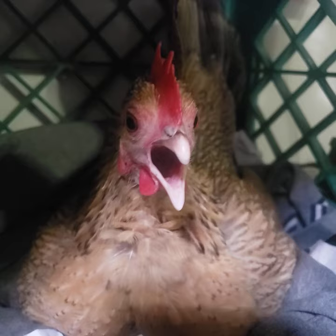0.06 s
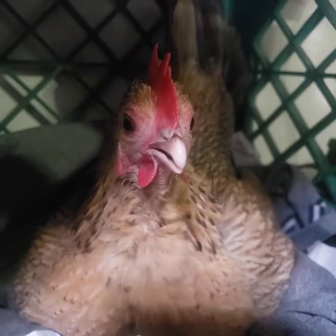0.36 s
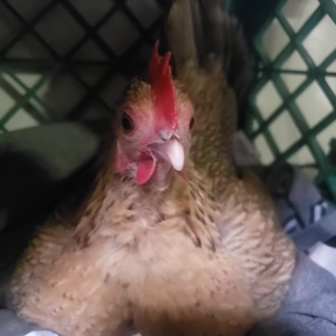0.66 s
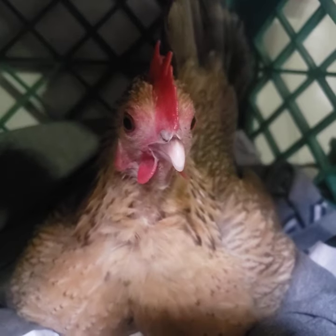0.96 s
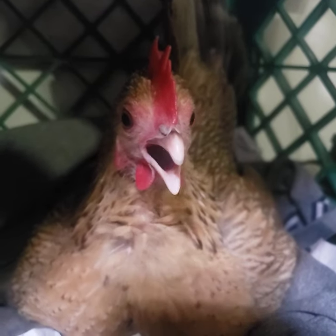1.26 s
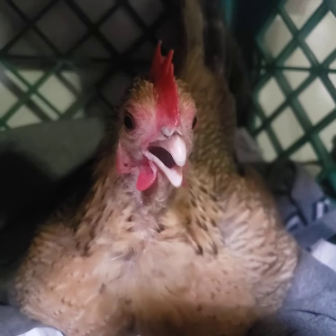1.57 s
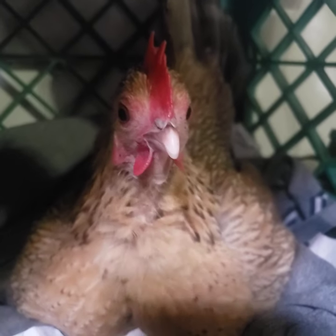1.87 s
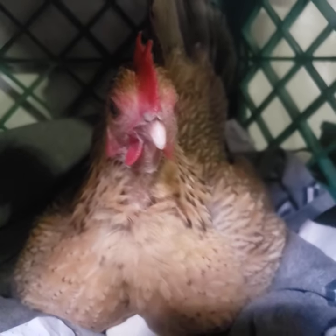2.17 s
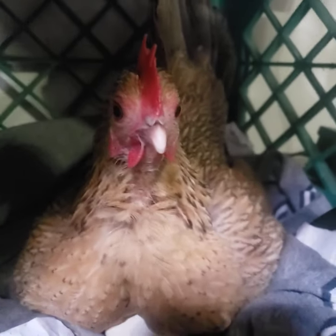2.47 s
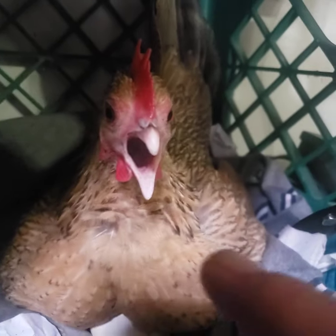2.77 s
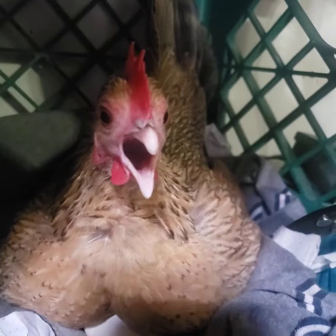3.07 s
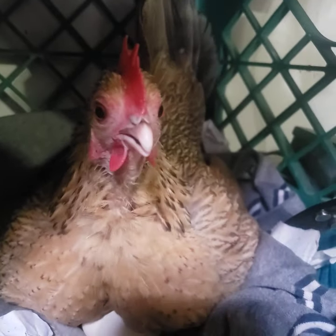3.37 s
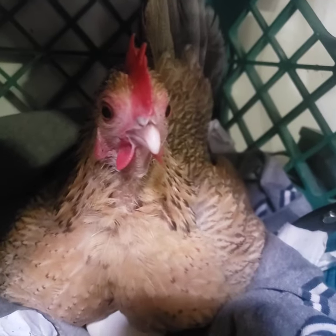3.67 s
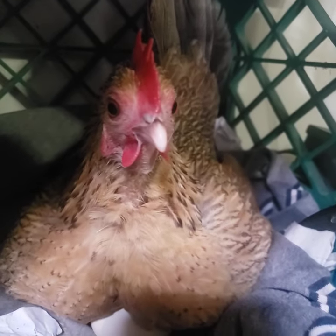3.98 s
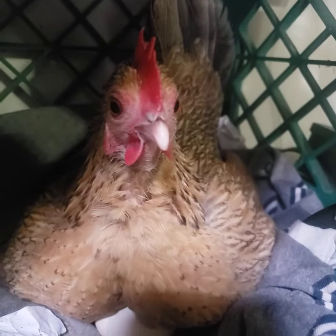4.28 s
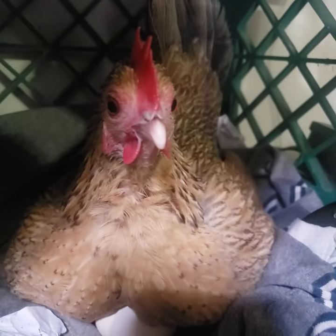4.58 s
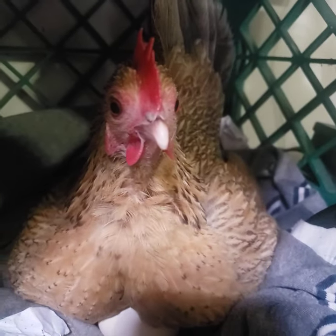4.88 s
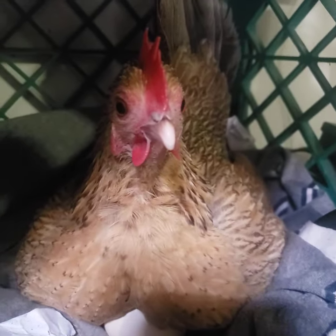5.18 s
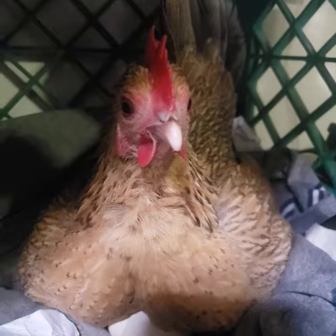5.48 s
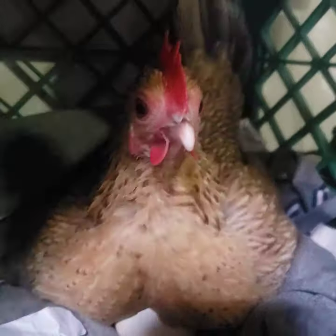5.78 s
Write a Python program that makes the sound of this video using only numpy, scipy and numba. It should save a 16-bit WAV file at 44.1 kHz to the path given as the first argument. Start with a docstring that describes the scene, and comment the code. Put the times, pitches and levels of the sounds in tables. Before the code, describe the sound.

A hen squawks three times at close range, with short pauses between, each call starting as a raspy growl and breaking into a throbbing cry. A faint bump and rustle of bedding comes before the last one. Tiny peeps and thin, high whines follow, then more soft rustling and a single tick from her plastic crate. The small room sounds dry, with a quiet hum underneath.

```python
"""Indoors, over a low room hum, a hen in a plastic crate gives three harsh, close squawks.
Each swells from a growl, breaks into full voice, arches in pitch and drops as the beak shuts;
her syrinx throbs and flips between two registers, ringing throat and beak. Bedding bumps and
rustles before the third. Then she peeps and whines softly. Background rumble and hiss grow louder
towards the end as the recorder's gain recovers; the bedding rustles and the crate ticks once."""
import sys
import numpy as np
from scipy import signal
from scipy.fft import rfft, irfft
from scipy.io import wavfile
from scipy.ndimage import uniform_filter1d, minimum_filter1d, map_coordinates
from numba import njit

SR = 44100
rng = np.random.default_rng(int(sys.argv[2]) if len(sys.argv) > 2 else 0)


def log_audio(samples):
    """Write samples as a 16-bit WAV file to the path given in sys.argv[1]."""
    # one column per channel
    frames = np.atleast_2d(samples).T
    # limit to full scale, then quantise
    limited = np.clip(frames, -1, 1)
    pcm = np.round(limited * 32767).astype(np.int16)
    wavfile.write(sys.argv[1], SR, pcm)


N = 261954
T = np.arange(N) / SR
FREQS_HZ = np.maximum(np.arange(2049) * SR / 4096, 1)

# background noise spectrum: freq_hz, gain_db
ROOM_SPECTRUM = [(15, -55), (25, -15.5), (44, -11.5), (64, -10.5), (82, -6.5), (102, -4.5), (153, -3.5),
                 (180, -9), (242, -5), (326, -16), (363, -17.5), (818, -28), (2550, -35), (7920, -54),
                 (16000, -68)]
# noise floor as the recorder's gain recovers: time_s, rumble_db (before trim), hiss_db
NOISE_FLOOR_RISE = [(0, -55, -64), (4.3, -58, -64.5), (4.7, -51.5, -61), (5.3, -51.5, -60.5),
                    (5.57, -47.5, -57.5), (5.79, -43, -54), (5.94, -43.5, -53)]
# appliance hum: freq_hz, level_db (before trim)
HUM_TONES = [(59.2, -59), (113.0, -64), (156.1, -62.5), (242.2, -68)]
# bedding rustles: time_s, half_length_s, scuff_db, hiss_db
BEDDING_RUSTLES = [(2.304, 0.048, -60.5, -67), (3.965, 0.016, -83, -60.5), (4.327, 0.024, -77, -68.5),
                   (5.529, 0.035, -59.5, -55.5), (5.685, 0.055, -62, -62), (5.768, 0.015, -57, -55)]
# bedding bumps: time_s, level_db
BEDDING_BUMPS = [(2.201, -58), (2.225, -56)]
# bedding and crate spectra: freq_hz, gain_db
SCUFF_SPECTRUM = [(200, 8), (700, 16.5), (1100, 11), (1400, -17), (1900, -22), (3000, -7), (8000, -42)]
HISS_SPECTRUM = [(800, -24), (2000, 1.5), (4000, -8.5), (5500, 1.5), (8200, -31), (12000, -8), (16000, -36)]
TICK_SPECTRUM = [(200, -6), (1200, -12), (2400, 0), (4000, -3), (6000, -17), (16000, -32)]
# soft peeps: time_s, peak_db, pitch_hz, half_length_s
PEEP_NOTES = [(3.638, -60.5, 1070, 0.016), (3.68, -56.5, 1153, 0.013), (3.883, -56, 1284, 0.013),
              (4.482, -59.5, 1416, 0.019), (4.731, -62, 1860, 0.017)]
# shut-beak whines: start_s, end_s, mid_pitch_hz, mid_level_db
WHINE_NOTES = [(3.679, 3.88, 1865, -69.5), (3.885, 4.125, 1907, -69.5), (4.114, 4.19, 2000, -63),
               (4.195, 4.32, 1965, -68), (4.472, 4.772, 1944, -54)]
# left microphone port re right: freq_hz, gain_db
PORT_SHADING = [(200, -3.5), (1400, 1.5), (1800, 2), (2200, 22.5), (2700, 23), (3100, 6), (3500, 13.5),
                (3800, 3), (4250, 12), (5500, 3.5), (7000, 0.5), (9500, 11), (12000, -2), (14000, 14)]
# left port re right: freq_hz, lead_rad
PORT_PHASE = [(0, -0.5), (1210, 1.6144), (1890, 3), (3530, 4), (3880, 6), (4390, 4.5), (5510, 11),
              (8790, 17), (9730, 11), (10200, 17), (11700, 14.5), (13300, 27.5), (14200, 12), (15800, 16.5)]
# windpipe resonances: freq_hz, width_hz, gain_db
THROAT_MODES = [(1230, 1900, -20), (1700, 470, -5.5), (2380, 1100, -2), (2640, 1900, -3.5), (3268, 400, 2),
                (4160, 560, -5.5), (5420, 880, -13.5), (7000, 140, -23.5), (7880, 95, -24.5),
                (9610, 1100, -19), (11020, 1100, -14.5), (13800, 1700, -13), (15700, 1500, -20.5)]
# voice cracks: time_s, half_length_s, lift_db, pitch_drop_share
VOICE_CRACKS = [(.009, 0.003, 9, 0.037), (0.107, 0.0063, 3.5, 0.0053), (0.171, 0.0037, 3, 0.017),
                (1.177, 0.004, 9, 0.0042), (1.199, 0.0036, 16, 0.13), (1.218, 0.0035, 4.5, 0.035),
                (1.295, 0.0046, 13.5, 0.17), (1.304, .005, 8.5, 0.087), (1.319, .006, 9.5, .11),
                (1.597, .008, 1.5, .06), (1.631, 0.0051, -9, .04), (1.643, 0.016, 2, 0.025)]
# timing per squawk: start_s, break_s, end_s
SQUAWK_TIMES = [(-.35, .06, .378), (1.116, 1.39, 1.671), (2.602, 2.86, 3.265)]
# lower-register arch per squawk: top_s, half_length_s, rest_hz, top_hz
PITCH_ARCHES = [(0.342, .03, 730.8, 828), (1.503, .112, 698, 815.3), (2.999, .18, 714.7, 782.5)]
# effort per squawk: loudest_s, full_db, growl_at_1s_db
SQUAWK_EFFORTS = [(.24, -19.5, -15.5), (1.455, -16.5, -17), (3.05, -19, -14.5)]
# timbre per squawk: throb_hz, growl_treble_db, full_treble_db, fundamental_db
SQUAWK_TIMBRES = [(49.16, -9.5, -9, -9), (38.42, -5.5, -8.5, -4), (40.76, -10, -7.5, -19.5)]
# register curve per squawk: time_s, upper_share
REGISTER_CURVES = [
    [(.17, 0.01), (.28, 0.48), (.31, .5), (.333, 0.04)],
    [(1.383, 0.02), (1.392, 0.99), (1.625, 1), (1.665, .7)],
    [(2.91, 0.05), (3.05, .35), (3.165, .75), (3.18, 0.9)],
]
# roughness curve per squawk: time_s, roughness (clipped to 0-1)
ROUGHNESS_CURVES = [
    [(0, 0.73), (.08, 0.99), (.31, 1.07), (.355, 0.48)],
    [(1.122, 0.36), (1.25, 0.77), (1.383, 0.82), (1.392, .08), (1.44, 0.3), (1.48, 0.18), (1.585, .22),
     (1.64, 0.9)],
    [(2.603, 0.48), (2.72, .95), (2.783, 0.78), (2.79, 0.13), (2.855, 0.1), (2.866, 0.88), (3.165, 0.8),
     (3.18, 0.02)],
]


def undb(db):
    return 10 ** (np.asarray(db) / 20)


def curves(rows, t):
    """Each value column, interpolated at t."""
    knots, *columns = np.transpose(rows)
    return [np.interp(t, np.sort(knots), column) for column in columns]


def colour(spectrum, freq_hz=FREQS_HZ):
    """Linear gain of a spectrum at freq_hz."""
    knots_hz, gain_db = np.transpose(spectrum)
    return undb(np.interp(np.log(freq_hz + 1), np.log(knots_hz), gain_db))


def unit_rms(x):
    return x / np.sqrt(np.mean(x ** 2))


def walk(rate_hz, n):
    """Smooth random wander, spread near 1."""
    position = np.arange(n) * rate_hz / SR
    return map_coordinates(rng.standard_normal(n // 4), [position], order=2, mode="wrap")


def noise(spectrum):
    """Coloured noise, rms 1."""
    gain = colour(spectrum, np.arange(N // 2 + 1) * SR / N)
    return unit_rms(irfft(rfft(rng.standard_normal(N)) * gain, N))


def ring(x, gain):
    """Minimum-phase filter with this gain over FREQS_HZ."""
    cepstrum = irfft(np.log(gain + 1e-6))
    half = len(cepstrum) // 2
    cepstrum[1:half] *= 2
    cepstrum[half + 1:] = 0
    return signal.fftconvolve(x, irfft(np.exp(rfft(cepstrum)))[:half])[:len(x)]


def split(x, hz):
    """Bands below and above hz."""
    low = signal.sosfiltfilt(signal.butter(4, hz, fs=SR, output="sos"), x)
    return low, x - low


def steady(pair, window_samples=2200):
    """Hold the slow level at rms 1; quick throbs stay."""
    return pair / np.sqrt(np.abs(uniform_filter1d(pair.mean(0) ** 2, window_samples)) + 1e-12)


@njit
def bandpass(x, centre_hz, width_hz):
    """State-variable band-pass, moving centre."""
    out, band_state, low_state = np.empty(len(x)), 0., 0.
    for i in range(len(x)):
        g, damping = np.tan(np.pi * centre_hz[i] / SR), width_hz / centre_hz[i]
        band = (band_state + g * (x[i] - low_state)) / (1 + g * (g + damping))
        band_state = 2 * band - band_state
        low_state += 2 * g * band
        out[i] = damping * band
    return out


def background(rumble_trim_db=1, hum_trim_db=-2, low_spread=.22, high_spread=.91):
    """Wavering appliance hum; near-mono rumble and wide hiss rise as the recorder's gain recovers."""
    rumble_db, hiss_db = curves(NOISE_FLOOR_RISE, T)
    low, high = split(noise(ROOM_SPECTRUM), 400)
    low_side, high_side = split(noise(ROOM_SPECTRUM), 400)
    sides = np.array([[1], [-1]])
    hum = sum(undb(db + hum_trim_db) * unit_rms(np.sin(2 * np.pi * hz * T + 2.1 * walk(10, N)))
              for hz, db in HUM_TONES)
    rumble = undb(rumble_db + rumble_trim_db) * (unit_rms(low) + low_spread * sides * unit_rms(low_side))
    hiss = undb(hiss_db) * (unit_rms(high) + high_spread * sides * unit_rms(high_side))
    return (rumble + hum) * undb([[-.4], [.4]]) + hiss


def walls(x, t60_s=.11, wet_db=-25, cutoff_hz=6500):
    """Short, dull tail of the crate and a small furnished room."""
    t = T[:SR // 2]
    tails = rng.standard_normal((2, len(t))) * undb(-60 * t / t60_s) * (t > .003)
    tails = signal.sosfilt(signal.butter(2, cutoff_hz, fs=SR, output="sos"), tails)
    return undb(wet_db) * np.array([signal.fftconvolve(x, h / np.linalg.norm(h))[:N] for h in tails])


def bedding(grain_db=3, grain_hz=270, bump_decay_s=.013):
    """Cloth bumps, scuffs and hisses in grains."""
    scuff, hiss = np.zeros((2, N))
    for time_s, half_s, scuff_db, hiss_db in BEDDING_RUSTLES:
        envelope = np.exp(-((T - time_s) / half_s) ** 2)
        scuff += undb(scuff_db) * envelope
        hiss += undb(hiss_db) * envelope
    for time_s, db in BEDDING_BUMPS:
        scuff += undb(db) * (T > time_s) * np.exp(-np.abs(T - time_s) / bump_decay_s)
    mid, side = (undb(grain_db * walk(grain_hz, N))
                 * (scuff * noise(SCUFF_SPECTRUM) + hiss * noise(HISS_SPECTRUM)) for _ in range(2))
    return np.array([mid + side, mid - side])


def crate_tick(time_s=5.6513, impulse_db=-10.5):
    """One impulse rings the plastic."""
    return ring(undb(impulse_db) * (np.arange(N) == int(time_s * SR)), colour(TICK_SPECTRUM))


def peeps(quiver=.03):
    """Short, quivering sine notes."""
    clock_s = np.cumsum(1 + quiver * walk(170, N)) / SR
    return sum(undb(db) * np.exp(-((T - time_s) / half_s) ** 2) * np.sin(2 * np.pi * hz * clock_s)
               for time_s, db, hz, half_s in PEEP_NOTES)


def whines(rise_hz_per_s=220, swell_db_per_s=22, attack_s=.017, release_s=.074):
    """Thin, fluttering shut-beak tones that rise and swell; purer when quiet."""
    out = np.zeros(N)
    waver = 1 + .012 * walk(200, N) + .00309 * walk(30, N)
    flutter = undb(2.6 * walk(90, N))
    for start_s, end_s, hz, db in WHINE_NOTES:
        from_mid_s = np.clip(T, start_s, end_s) - (start_s + end_s) / 2
        phase = 2 * np.pi * np.cumsum((hz + rise_hz_per_s * from_mid_s) * waver) / SR
        gate = np.clip(np.minimum((T - start_s) / attack_s, (end_s - T) / release_s), 0, 1)
        bright = undb(.11 * (db + 45))
        overtones = bright * undb(-12) * np.sin(2 * phase) + bright ** 2 * undb(-14) * np.sin(3 * phase)
        tone = np.sqrt(2) * (np.sin(phase) + overtones)
        out += gate * flutter * undb(db + swell_db_per_s * from_mid_s) * tone
    return out


def ports(x):
    """The right microphone port faces away: the hen arrives later and shaded."""
    lead_rad, = curves(PORT_PHASE, FREQS_HZ)
    response = np.fft.fftshift(irfft(np.exp(-1j * lead_rad) / colour(PORT_SHADING)))
    return np.array([x, signal.fftconvolve(x, response)[len(response) // 2:][:len(x)]])


def crate_bounce(pair, gain=.87, delay_s=.0014, sway=.07):
    """One wall reflection per port; the path shifts as the head moves."""
    i = np.arange(pair.shape[1])
    echoes = [np.interp(i - SR * delay_s * (1 + sway * walk(3.2, len(i))), i, x) for x in pair]
    return pair + gain * np.array(echoes)


def cracks(t):
    """Brief voice cracks: lift in dB, pitch factor."""
    lift_db, pitch_factor = 0, 1
    for time_s, half_s, db, drop in VOICE_CRACKS:
        bump = np.exp(-((t - time_s) / half_s) ** 4)
        lift_db += bump * db
        pitch_factor -= bump * drop
    return lift_db, pitch_factor


def pitch(t, start_s, end_s, top_s, half_s, rest_hz, top_hz, scoop_s=.019, drop_s=.011):
    """Lower-register pitch in Hz: scoop up, flat-topped arch, final drop."""
    arch_hz = rest_hz + (top_hz - rest_hz) * np.exp(-np.abs((t - top_s) / half_s) ** 5)
    scoop = 1 - .34 * np.exp((start_s - t) / scoop_s)
    drop = 1 - .37 * np.exp((t - end_s) / drop_s)
    return arch_hz * scoop * drop


def effort(t, start_s, break_s, end_s, loudest_s, full_db, growl_at_1s_db, crossfade_s=.013):
    """Level in dB and full-voice share: a growl grows linearly, then breaks into a hump."""
    full = np.clip(.5 + (t - break_s) / crossfade_s, 0, 1)
    growl_db = growl_at_1s_db + 20 * np.log10(t - start_s)
    hump_db = full_db - 16 * ((t - loudest_s) / (end_s - break_s)) ** 2
    return (1 - full) * growl_db + full * hump_db, full


def beak(db, left_s, cry, half_open_db=-39, closing_s=.075, shut_hz=950, open_hz=3050, cry_hz=2200):
    """Opening 0-1 and mouth resonance in Hz; opens with effort, narrows near the end."""
    closing = 1 - .42 * np.exp(-(left_s / closing_s) ** 4)
    opening = closing / (1 + np.exp((half_open_db - db) / 8))
    return opening, (1 - cry) * (shut_hz + (open_hz - shut_hz) * opening) + cry * cry_hz


def vocal_tract(source, mouth_hz, mouth_gain=2.1, mouth_width_hz=700., low_cut_hz=880):
    """Mouth and windpipe resonate; a small beak radiates little bass."""
    power = sum((undb(db) / (1 + (2 * (FREQS_HZ - hz) / width_hz) ** 2)) ** 2
                for hz, width_hz, db in THROAT_MODES)
    gain = np.sqrt(power / (1 + (low_cut_hz / FREQS_HZ) ** 6))
    return ring(source + mouth_gain * bandpass(source, mouth_hz, mouth_width_hz), gain)


def syrinx(t, hz, upper, rough, soft, throb_hz, fundamental_db, leap_ratio):
    """Membranes clap twice a cycle, unequally; forced, they throb, stumble and leap a register."""
    n = len(t)
    throb_cycles = np.cumsum(throb_hz * (1 + .14 * walk(60, n))) / SR
    throb = np.tanh(2 * np.sin(2 * np.pi * throb_cycles)) * (1 - .65 * soft)
    # the upper register holds for part of each throb
    leapt = uniform_filter1d(1. * (throb_cycles % 1 < 1.4 * upper - .2), size=50)
    hz = hz * leap_ratio ** leapt * (1 - .04 * np.sqrt(rough) * throb)
    throb_db = 3.5 * rough * throb * (1 - upper)
    # membranes lock on each swell, stumble in between
    rough = rough * (1 - .42 * throb)
    jitter = rough * (.025 * (1 - soft) * walk(250, n) + .065 * walk(1400, n))
    phase = 2 * np.pi * np.cumsum(hz * (1 + jitter)) / SR
    odd_gain = undb(-7 * (1 - leapt) - 5 * leapt)
    claps = undb(fundamental_db * (1 - leapt * upper)) * np.cos(phase)
    for k in range(2, 27):
        gain = odd_gain ** (k % 2) * (k / 4) ** (-1.2 * soft) * (k * hz < SR * .42)
        claps += gain * np.cos(k * phase - .4 * k * k)  # rolling closure: high partials lag
    period_doubling = (.25 + .45 * leapt) * np.cos(phase / 2)
    claps *= 1 + rough * (period_doubling + .2 * walk(900, n))
    air_gain = .6 * (rough ** 1.8 * (1 + 3 * soft) + .025)
    air = air_gain * (1 + np.cos(2 * phase)) * rng.standard_normal(n)
    return (claps + air) * undb(throb_db)


def squawks(leap_ratio=1.4, shrill_hz=3950, shrill_half_width_hz=290, shrill_db=10,
            shut_treble_db=-20.5, rasp_top_db=1.5, cry_top_db=-6.5, gate_s=.013):
    """The syrinx drives the vocal tract; effort sets loudness and brightness."""
    out = np.zeros((2, N))
    for i, (start_s, break_s, end_s) in enumerate(SQUAWK_TIMES):
        throb_hz, growl_treble_db, full_treble_db, fundamental_db = SQUAWK_TIMBRES[i]
        span = (T > start_s) & (T < end_s)
        t = T[span]
        upper, = np.clip(curves(REGISTER_CURVES[i], t), 0, 1)
        rough, = np.clip(curves(ROUGHNESS_CURVES[i], t), 0, 1)
        cry = upper ** 4  # sustained upper register
        lift_db, pitch_factor = cracks(t)
        hz = pitch(t, start_s, end_s, *PITCH_ARCHES[i]) * pitch_factor
        db, full = effort(t, start_s, break_s, end_s, *SQUAWK_EFFORTS[i])
        opening, mouth_hz = beak(db, end_s - t, cry)
        soft = np.clip(.12 * (-22 - db - lift_db), 0, 1)
        source = syrinx(t, hz, upper, rough, soft, throb_hz, fundamental_db, leap_ratio)
        body, treble = split(ports(vocal_tract(source, mouth_hz)), 3800)
        treble, top = split(treble, 8000)
        treble = crate_bounce(treble + undb((1 - cry) * rasp_top_db + cry * cry_top_db) * top)
        # shrill where the fourth partial meets a windpipe resonance
        shrill = cry / (1 + ((4 * leap_ratio * hz - shrill_hz) / shrill_half_width_hz) ** 2)
        treble_db = (1 - full) * growl_treble_db + full * full_treble_db
        treble_db += shut_treble_db * (1 - opening) ** 4 + shrill_db * shrill - .55 * lift_db
        gate = np.clip(np.minimum(t - start_s, end_s - t) / gate_s, 0, 1)
        out[:, span] = gate * undb(db + lift_db) * (steady(body) + undb(treble_db) * steady(treble))
    return out


def scene():
    """Hen, bedding, crate and background."""
    hen = squawks() + (whines() + peeps()) * undb([[1.5], [-1.5]])
    near = hen + bedding() + crate_tick()
    return near + walls(near[0]) + background()


def record(dry, ceiling=.94, cutoff_hz=15900):
    """Fast peak limiter, then a steep low-pass."""
    gain = ceiling / np.maximum(np.abs(dry).max(0), ceiling)
    gain = uniform_filter1d(minimum_filter1d(gain, size=130), size=130)
    return signal.sosfilt(signal.ellip(10, .2, 80, cutoff_hz, fs=SR, output="sos"), dry * gain)


dry = scene()
out = record(dry)
log_audio(out)
```